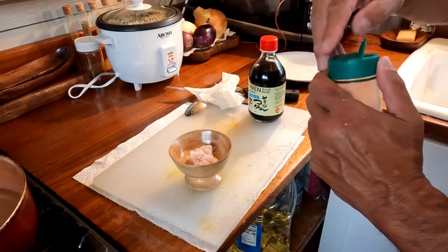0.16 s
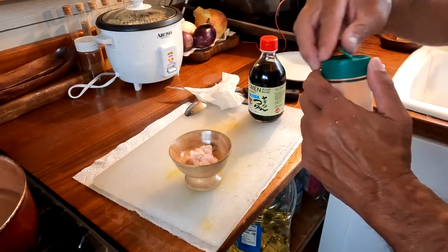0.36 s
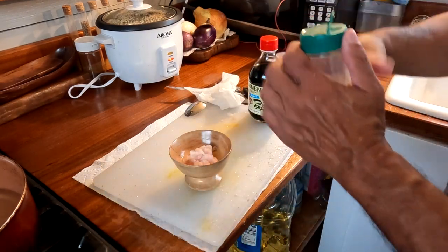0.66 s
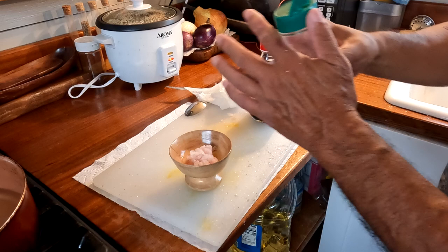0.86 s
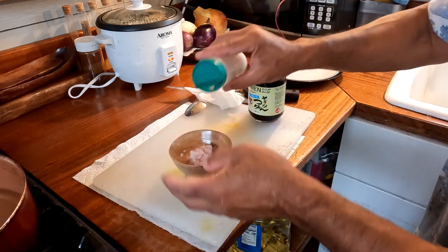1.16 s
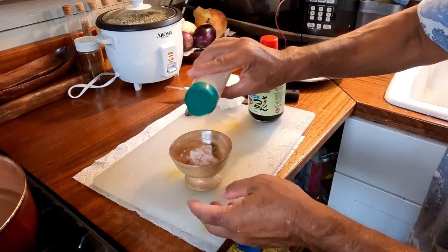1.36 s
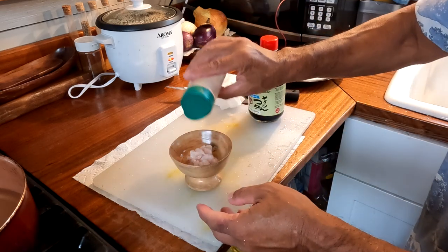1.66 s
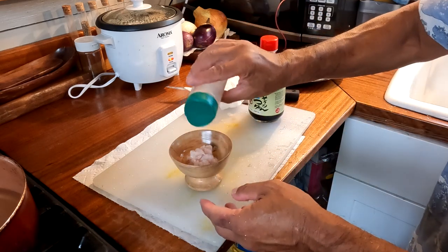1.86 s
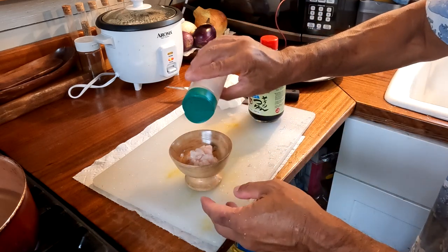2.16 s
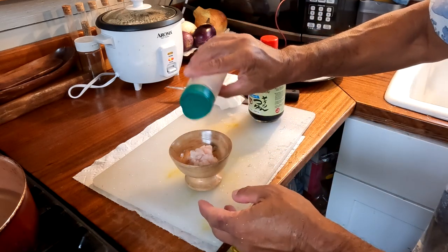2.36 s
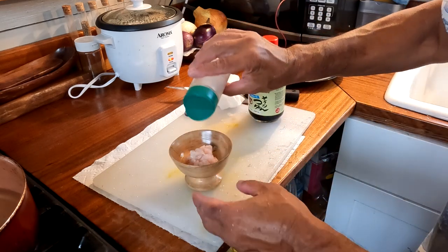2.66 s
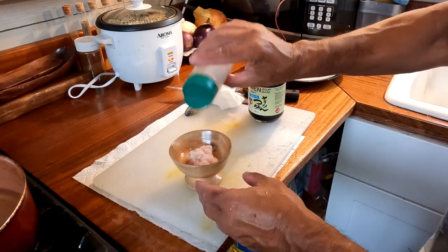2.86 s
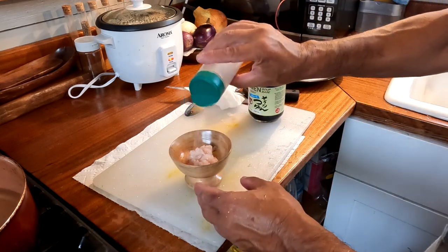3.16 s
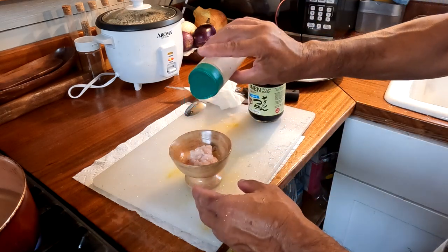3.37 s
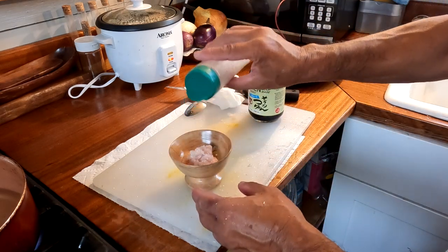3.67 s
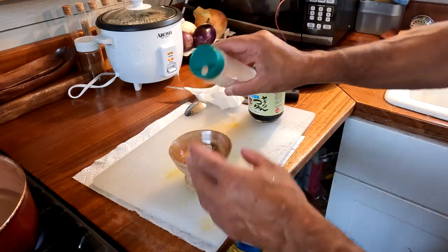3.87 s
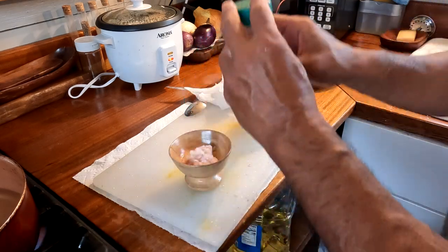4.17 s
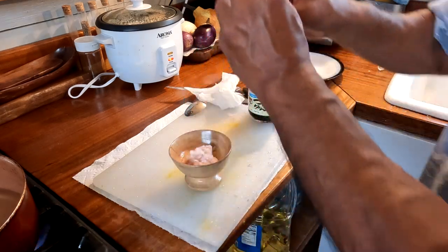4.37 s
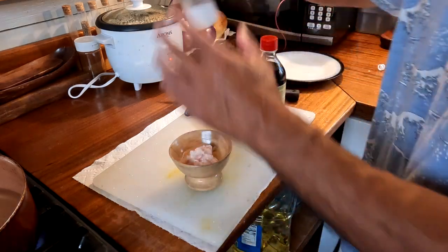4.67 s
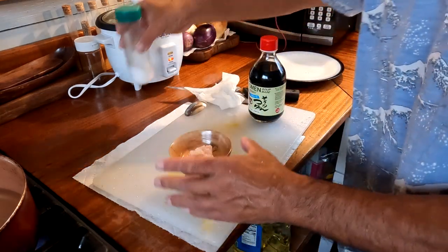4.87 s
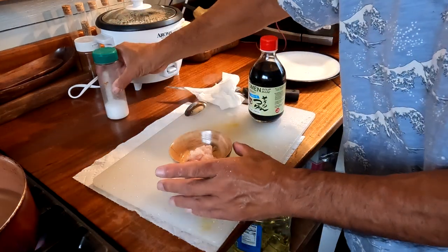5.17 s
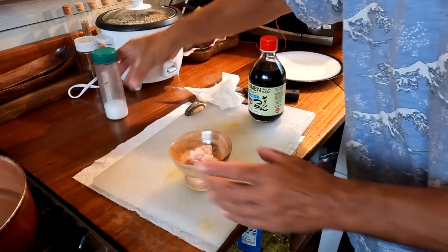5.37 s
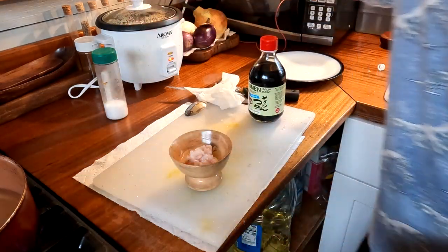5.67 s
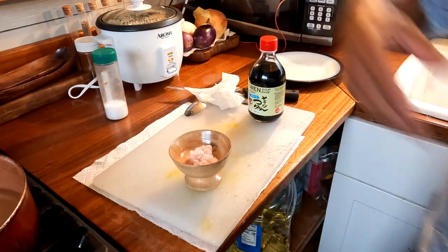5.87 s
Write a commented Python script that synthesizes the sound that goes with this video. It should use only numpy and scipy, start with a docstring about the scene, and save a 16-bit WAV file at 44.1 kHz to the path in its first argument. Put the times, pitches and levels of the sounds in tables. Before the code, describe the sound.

A stereo microphone sits near a plastic salt shaker in a small room. After a brief hinge scrape and light finger ticks, salt slides and patters in fast regular bursts of bright, fine hiss for over two seconds. A dull bump comes midway. Then a tumbling rush of grains, a crisp snap, small ticks and a hard knock on wood, leaving the soft hum and a closing scuff.

```python
"""A plastic salt shaker close to a stereo microphone in a small kitchen, over the low hum of an appliance.
Salt is a rain of tiny impacts: it slides down the tube, is shaken out in a quick, even beat and slides back.
Filtered cracks and damped modes make the lid snapping shut and the shaker put down on the wooden counter.
Before the shaking the hinge scrapes open; partway through it something bumps the microphone.
Light ticks, dull handling, a hum from one sine and soft coloured noise fill the rest."""
import sys
import numpy as np
from scipy import signal
from scipy.io import wavfile
from scipy.ndimage import uniform_filter1d

SR = 44100
rng = np.random.default_rng(int(sys.argv[2]) if len(sys.argv) > 2 else 0)


def output_pcm(signal):
    """Save a mono or channel-first signal as 16-bit PCM at the path in sys.argv[1].

    Samples are clipped to [-1, 1] before scaling.
    """
    pcm = np.clip(np.atleast_2d(signal).T, -1, 1) * 32767
    wavfile.write(sys.argv[1], SR, np.round(pcm).astype(np.int16))


N = 265923
TIME = np.arange(N) / SR  # s


def salt():
    """Grains patter on the plastic wall in uneven clumps; fine hiss and the tube's rush follow one flow."""
    # salt sliding along the tube as it is turned: peak t/s, level/dB before trim, half-length/s
    slide_rows = [(0.797, -58.5, 0.023), (1.065, -52.5, 0.074), (1.168, -55, 0.048), (1.33, -39, 0.036),
                  (1.39, -46, 0.092), (4.068, -45.5, 0.062), (4.166, -35, 0.067), (4.305, -50, 0.14),
                  (4.602, -59.5, 0.022), (4.711, -65, 0.083), (4.933, -58, 0.047)]
    # salt thrown up inside the tube by a jolt: t/s, level/dB before trim, rise/s, decay constant/s
    jolts = [(0.392, -53, .002, .007), (0.985, -50, 0.0016, 0.019), (1.293, -53, 0.013, 0.017),
             (2.862, -46.5, 0.0035, 0.014), (4.395, -44.5, .01, 0.012), (4.884, -61, 0.0023, 0.0091),
             (5.043, -61.5, 0.0037, 0.017), (5.203, -40, 0.0076, 0.04), (5.238, -34.5, .016, 0.0083)]
    # colour of the fine patter: f/Hz, relative level/dB
    hiss = [(1760, -31.5), (3000, -31), (3790, -28), (4060, -20.5), (5060, -25.5), (7030, 5), (7480, 4.5),
            (7960, 2), (8640, -6), (9780, -14), (10900, -7), (11500, -5), (13000, -11.5), (14600, -36.5),
            (15500, -49.5)]
    # colour of the rush in the tube: f/Hz, relative level/dB
    tube = [(900, -37), (1700, -8.5), (1920, -5), (2200, -7.5), (3500, -4.5), (5000, -6), (6200, 0.5),
            (8500, -27.5), (12000, -36)]
    # modes rung by a single crystal: f/Hz, relative level/dB, t60/s
    ping = [(4140, -4, .012), (7120, 1.5, .009), (11100, -4, .007)]
    # the largest crystals striking: t/s, level/dB
    crystals = [(3.183, -51), (3.246, -48.5), (3.747, -54.5)]

    slide_power = sum((amp(db) * surge(TIME - s, half)) ** 2 for s, db, half in slide_rows)
    # loose grains stir while the shaker is in the hand: a flat-topped swell
    held_s, held_half_s = 2.82, 1.82
    stir = amp(-64) * surge((TIME - held_s) ** 2, held_half_s ** 2)
    flow = np.sqrt(shaking() + slide_power + stir ** 2)

    rough = uniform_filter1d(rng.standard_normal(N), size=400)
    clumps = unit(uniform_filter1d(rough, size=300))
    flow = flow * amp(0.86 * clumps) + swells(jolts)
    fullness = flow / flow.max()

    fine = colour(grains(per_s=8500, spread_db=5.0), hiss)
    # turned upright at 3.95 s: the tube rushes more when the salt lands on its hard base
    upright_s, tube_at_lid_db, tube_at_base_db = 3.95, -8, -4
    tube_db = np.where(TIME < upright_s, tube_at_lid_db, tube_at_base_db)
    heap = colour(grains(per_s=6400, spread_db=2.5), tube) * amp(tube_db)

    # single crystals ping out while the stream is thin
    struck = signal.oaconvolve(grains(per_s=48, spread_db=6.5), ring(ping))[:N]
    pings = unit(struck) * amp(-13.5) * (1 - fullness) ** 2
    out = flow * (fine + heap + pings) * amp(-2.0)  # trim
    for s, db in crystals:
        add(out, s, amp(db) * ring(ping))
    return kitchen(out, wet_db=-5.5, pan_db=1.5)


def shaking():
    """Forward strokes throw salt at the lid, each return throws a little back; gives the power of the flow."""
    # strength of the shaking, silent outside these times: t/s, level/dB before trim
    effort_rows = [(1.42, -60), (1.53, -45), (1.6, -50.5), (1.7, -54.5), (1.89, -50.5), (3.15, -49),
                   (3.37, -57), (3.6, -50.5), (3.86, -55.5), (3.98, -75)]
    shake_hz, first_shake_s = 6.5, 1.584  # the wrist's steady beat, and the peak of one forward stroke
    stroke_s, return_s, return_db = 0.044, 0.017, -3  # half-lengths of the surges; level of the return
    dribble_db = -9  # salt that keeps running between strokes
    uneven_db = 0.35  # strokes differ a little in strength

    beats = (TIME - first_shake_s) * shake_hz
    stroke = np.round(beats - np.floor(beats[0])).astype(int)
    strength = amp(uneven_db * rng.standard_normal(size=64))[stroke]
    forward = strength * surge((beats - np.round(beats)) / shake_hz, stroke_s)
    back = amp(return_db) * surge((beats % 1 - .5) / shake_hz, return_s)
    effort = amp(np.interp(TIME, *np.transpose(effort_rows), left=-np.inf, right=-np.inf))
    return effort ** 2 * (forward ** 2 + back ** 2 + amp(dribble_db) ** 2)


def lid():
    """The hinge scrapes open as dense grains; later the catches snap shut and the lid's modes ring."""
    # the hinge scraping: t/s, level/dB, rise/s, decay constant/s
    hinge = [(0.066, -42.5, 0.01, 0.012), (0.092, -48, 0.0019, 0.005)]
    # colour of the scrape: f/Hz, relative level/dB
    hinge_colour = [(710, -51), (1200, -38), (1680, -8), (1830, -9), (2090, -6), (2790, -2.5), (4660, -18),
                    (6540, -6.5), (7870, -11.5), (10100, -36), (11500, -21), (14000, -43)]
    # catches snapping home: t/s, level/dB before trim
    snaps = [(4.3875, -21.5), (4.389, -21.5), (4.395, -29.5)]
    # colour of the snap: f/Hz, relative level/dB
    lid_colour = [(200, -20), (700, -17.5), (1300, -9.5), (2150, 2.5), (2700, -5.5), (3900, 0), (5000, -11),
                  (6200, -2), (7400, -2), (8300, -17.5), (9600, -30.5), (11000, -14.5), (13000, -22),
                  (14500, -52)]
    # modes of the lid: f/Hz, relative level/dB, t60/s
    lid_modes = [(1735, -8, 0.054), (2183, 2, 0.03), (3250, -12, 0.022), (4320, -12, .04)]

    scrape = colour(grains(per_s=5700, spread_db=2.5), hinge_colour) * swells(hinge)
    out = kitchen(scrape, wet_db=-5.5, pan_db=0.0)
    for s, db in snaps:  # each snap gets its own random echoes, so no comb colour lingers
        snap = np.zeros(N)
        contact = crack(lid_colour, t60=0.006, crunch_db=1.0)
        add(snap, s, amp(db) * (contact + amp(-10.5) * ring(lid_modes)))
        out += kitchen(snap * amp(-0.5), wet_db=-1.5, pan_db=1.5)
    return out


def knocks():
    """The base lands on one edge and rocks flat: the counter's modes thud and the shaker clacks."""
    # hard things meeting the counter: t/s, thud level/dB and clack level/dB, both before trim
    knock_rows = [(5.2001, -26.5, -32.5), (5.2087, -44.5, -26.5), (5.225, -32, -41)]
    # modes of the wooden counter: f/Hz, relative level/dB, t60/s
    counter = [(157, 3, 0.063), (293, 8, 0.15), (354, 0, 0.066), (430, 4.5, 0.052), (699, -1.5, 0.17),
               (900, 0, 0.034), (1360, -9, 0.037)]
    # modes of the shaker: f/Hz, relative level/dB, t60/s
    base = [(1570, -2, 0.1), (2013, 13, 0.035), (2260, 10, 0.087), (2880, -15, .04), (3490, -8, 0.03),
            (4130, -18, 0.031)]
    # colour of the clack: f/Hz, relative level/dB
    knock_colour = [(290, -27), (500, -2.5), (1520, -10), (1990, 0.5), (2500, -10.5), (3370, -3),
                    (4540, -21.5), (7260, -23), (11400, -45), (13000, -47), (15000, -70)]

    thuds, clacks = np.zeros((2, N))
    for s, thud_db, clack_db in knock_rows:
        add(thuds, s, amp(thud_db) * ring(counter))
        contact = crack(knock_colour, t60=0.02, crunch_db=5.5)
        add(clacks, s, amp(clack_db) * (contact + amp(-4.0) * ring(base)))
    thuds_in_room = kitchen(thuds * amp(4.0), wet_db=-0.5, pan_db=0.3)
    return thuds_in_room + kitchen(clacks * amp(-0.5), wet_db=-3.0, pan_db=2.5)


def ticks():
    """Small contacts on the plastic, each a broad resonance; the lower it is, the longer it rings."""
    # light ticks of fingers and lid: t/s, level/dB before the treble is dulled, centre f/Hz
    tick_rows = [(0.035, -59, 3630), (0.293, -65, 2600), (0.716, -62, 2470), (0.734, -55, 2020),
                 (3.22, -55, 2530), (3.972, -56, 3300), (4.277, -39, 1810), (4.46, -39, 1600),
                 (4.547, -54.5, 1560), (4.69, -59.5, 1980), (4.884, -61.5, 2060), (5.044, -52, 1550),
                 (5.372, -54.5, 1630), (5.629, -63.5, 3610)]
    # a tick's resonance: multiple of its centre frequency, relative level/dB
    tick_shape = [(.17, -24.5), (.53, -10.5), (1, -3), (1.4, -9), (2.2, -16.5), (4, -21)]
    # ring time falls with this power of the pitch, towards a minimum
    min_t60_s, extra_t60_s, ref_hz, damping = .015, .08, 1700, 3

    out = np.zeros(N)
    for s, db, hz in tick_rows:
        hump = [(hz * multiple, shape_db) for multiple, shape_db in tick_shape]
        t60 = min_t60_s + extra_t60_s * (ref_hz / hz) ** damping
        add(out, s, amp(db) * crack(hump, t60, crunch_db=7))
    dulled = signal.sosfilt(signal.butter(6, 8000, fs=SR, output="sos"), out)
    return kitchen(dulled + amp(-26.5) * out, wet_db=-4, pan_db=1.5)


def bump():
    """A soft touch sways the microphone, scuffs its housing and rings its mount; handling adds dull bumps."""
    # scuffs against the microphone: t/s, level/dB, rise/s, decay constant/s
    scuffs = [(2.86, -33.5, 0.0091, 0.032), (2.882, -44, 0.0088, 0.01), (6.012, -36.5, 0.015, 0.034)]
    # colour of the scuffs: f/Hz, relative level/dB
    scuff_colour = [(70, -6), (150, -3.5), (220, -4.5), (310, 0.5), (420, -13), (540, -15), (1150, -7.5),
                    (2300, -15.5), (3500, -25.5), (6000, -28), (9000, -60)]
    # dull handling bumps: t/s, level/dB, rise/s, decay constant/s
    handling = [(0.39, -49.5, 0.0044, 0.0047), (2.77, -44, 0.09, 0.064), (4.035, -46, 0.0086, 0.051)]
    # colour of the handling: f/Hz, relative level/dB
    dull = [(40, -9), (140, -0.5), (290, -3), (500, -17), (3000, -39.5)]
    # modes of the microphone's mount: f/Hz, relative level/dB, t60/s
    mount = [(322, -2, 0.24), (525, -5, 0.14), (1180, -12, .06)]

    out = colour(grains(per_s=3000, spread_db=-1.5), scuff_colour) * swells(scuffs)
    out += colour(rng.standard_normal(N), dull) * swells(handling)
    bump_s, bump_hz, length_s = 2.859, 31, .074
    t = TIME[:round(length_s * SR)]
    arch = np.sin(np.pi * (t / length_s) ** 0.8)
    add(out, bump_s, amp(-15.5) * np.sin(2 * np.pi * bump_hz * t) * arch)
    mount_s, mount_db = 2.879, -33.5
    add(out, mount_s, amp(mount_db) * ring(mount))
    return np.array([out, out])  # carried through the housing, alike at both ears


def background():
    """An appliance motor hums as one sine of drifting level under soft room noise."""
    # rms level of the hum: t/s, level/dB
    hum_rows = [(0.05, -34.5), (4.38, -36), (4.85, -42.5), (5.2, -40.5), (5.4, -47), (5.56, -41.5)]
    # colour of the room noise: f/Hz, relative level/dB
    air = [(30, -15.5), (90, -19), (150, -21.5), (300, -27.5), (600, -33), (1500, -38), (3800, -46),
           (5200, -56.5), (7400, -46), (9500, -65.5), (11500, -57.5), (15500, -67)]
    hum_hz, air_db = 59.4, -57

    s, db = np.transpose(hum_rows)
    hum = np.sqrt(2) * amp(np.interp(TIME, s, db)) * np.sin(2 * np.pi * hum_hz * TIME)
    mid, side = (colour(rng.standard_normal(N), air) for _ in range(2))
    return hum + amp(air_db) * (mid + amp(-8) * np.array([side, -side]))


def kitchen(x, wet_db, pan_db, size=256):
    """Direct sound and dense echoes from counter and cupboards; the bass is nearly alike at both ears."""
    # how much the echoes differ between the ears: f/Hz, side level/dB
    width = [(200, -21.5), (800, -10.5), (2400, 1.5), (7000, -5), (12000, 1)]
    # decay of the echoes: f/Hz, t60/s
    room = [(200, 0.2), (1500, 0.18), (4000, 0.21), (10000, 0.17)]

    t = TIME[:SR // 2]
    hits = (rng.random((2, len(t))) < 5000 / SR) * (t > .002)  # 5000 echoes/s, none in the first 2 ms
    taps = rng.choice([-1, 1], (2, len(t))) * hits
    hz, at, (mid, side) = signal.stft(taps, SR, nperseg=size)
    side = side * amp(read(width, hz))[:, None]
    ears = np.array([mid + side, mid - side]) * amp(-60 * at / read(room, hz)[:, None])
    tail = signal.istft(ears, SR, nperseg=size)[1]
    echoes = signal.fftconvolve(x[None], tail / np.linalg.norm(tail.mean(0)), axes=1)[:, :N]
    blend = (x + amp(wet_db) * echoes) / np.hypot(1, amp(wet_db))
    return blend * amp([[pan_db / 2], [-pan_db / 2]])  # positive pan: first channel louder


def grains(per_s, spread_db):
    """A steady rain of tiny impacts with exponentially spread dB sizes, scaled to rms 1."""
    size = amp(spread_db * np.minimum(rng.exponential(1, N), 4))
    return unit(size * rng.choice([-1, 1], N) * (rng.random(N) < per_s / SR))


def crack(points, t60, crunch_db):
    """A sharp contact followed by a brief crunch, in the given colour."""
    push = fade(t60) * rng.choice([-1, 1], len(fade(t60)))
    push = push / np.linalg.norm(push) * amp(crunch_db)
    push[0] = 1
    return blow(colour(push, points))


def ring(modes):
    """Damped modes set off together, with alternating sign."""
    t = TIME[:SR // 3]
    total = np.zeros(len(t))
    for k, (hz, db, t60) in enumerate(modes):
        total += amp(db) * fade(t60) * np.sin(2 * np.pi * hz * t) * (-1) ** k
    return blow(total)


def colour(x, points, size=4096):
    """Causal minimum-phase filter of unit energy with the given spectrum."""
    log_gain = np.log(amp(read(points, abs(np.fft.fftfreq(size, 1 / SR)))))
    taps = np.fft.ifft(np.exp(np.conj(signal.hilbert(log_gain)))).real[:size // 2]
    return signal.oaconvolve(x, taps / np.linalg.norm(taps))[:len(x)]


def swells(rows):
    """Envelope of bursts that rise in a straight line and die away exponentially."""
    total = np.zeros(N)
    for s, db, rise, decay in rows:
        attack = np.clip((TIME - s) / rise, 0, 1)
        total += amp(db) * attack * np.exp(-np.maximum(TIME - s - rise, 0) / decay)
    return total


def surge(s, half):
    """A smooth swell around s = 0, down to 1/e at the half-length."""
    return np.exp(-(s / half) ** 2)


def fade(t60):
    """A dying envelope, 60 dB down after t60."""
    return amp(-60 * TIME[:SR // 3] / t60)


def blow(x):
    """Scales a short sound to the energy of 10 ms at rms 1."""
    return x / np.linalg.norm(x) * np.sqrt(SR / 100)


def amp(db):
    """Decibels to gain."""
    return 10 ** (np.asarray(db) / 20)


def unit(x):
    """Scales to rms 1."""
    return x / np.sqrt(np.mean(x ** 2) + 1e-20)


def read(points, hz):
    """A spectrum's value on a log-frequency axis."""
    f, value = np.transpose(points)
    return np.interp(np.log(hz + 1), np.log(f), value)


def add(mix, s, sound):
    """Mixes a sound in at time s, in place."""
    part = mix[max(round(s * SR), 0):][:len(sound)]
    part += sound[:len(part)]


def scene():
    """Everything heard at the counter."""
    return salt() + lid() + knocks() + ticks() + bump() + background()


def record(dry):
    """The recorder's band limit: a steep low-pass at 15.4 kHz."""
    taps = signal.firwin(511, 15400, window=("kaiser", 9), fs=SR)
    return signal.oaconvolve(dry, taps[None], "same")


dry = scene()
out = record(dry)
output_pcm(out)
```